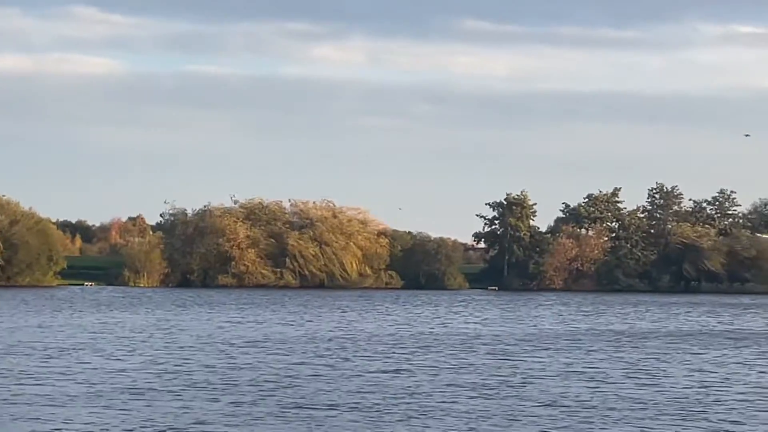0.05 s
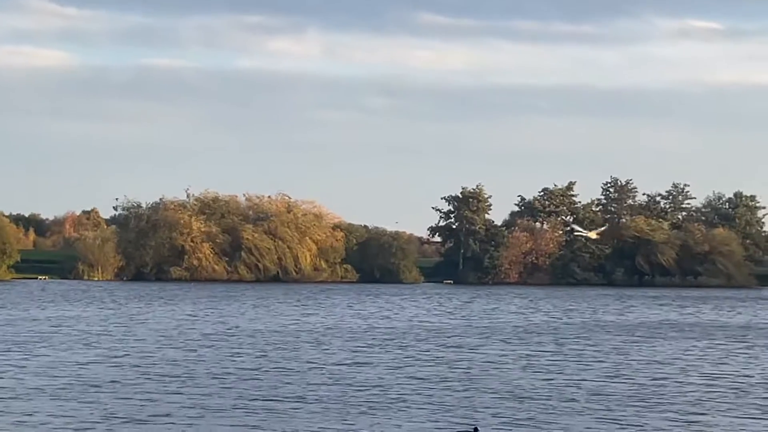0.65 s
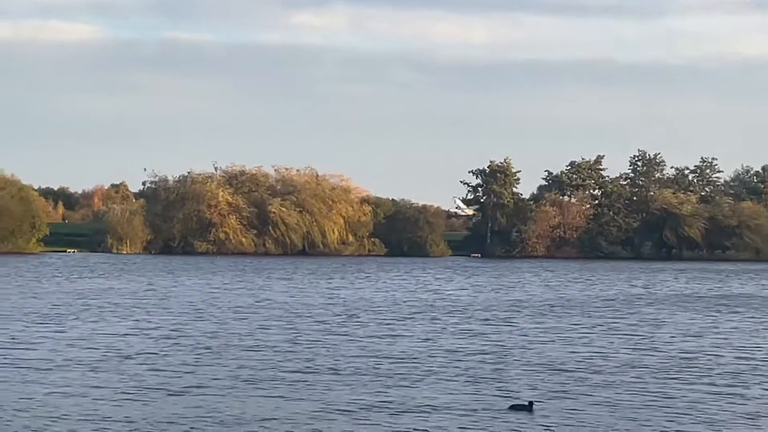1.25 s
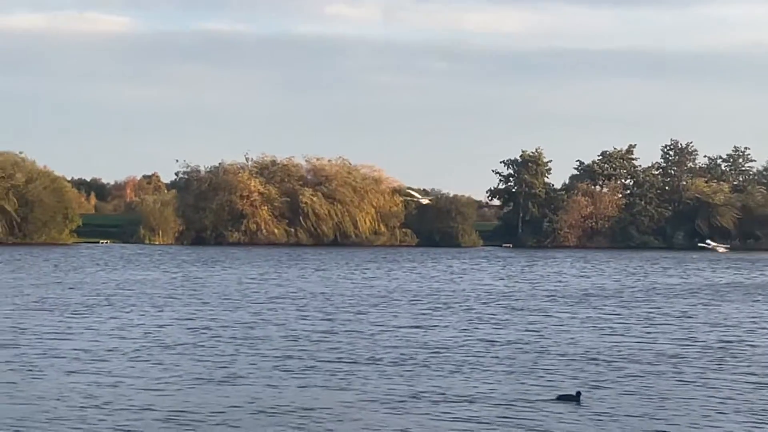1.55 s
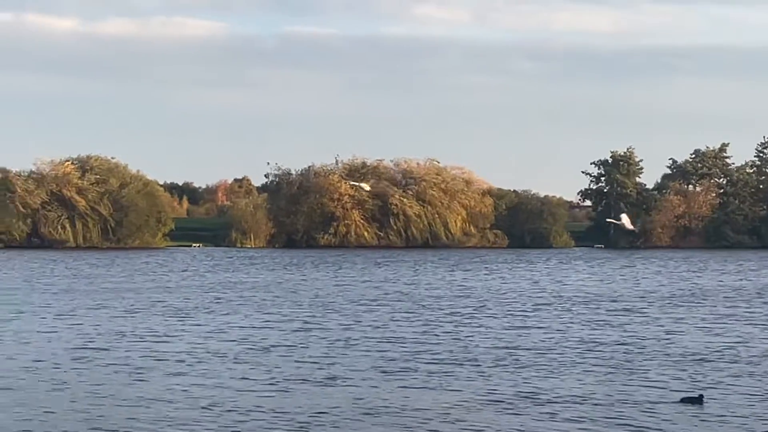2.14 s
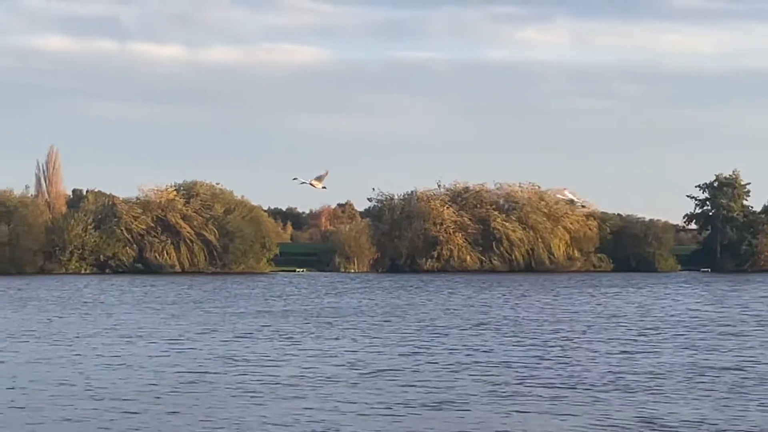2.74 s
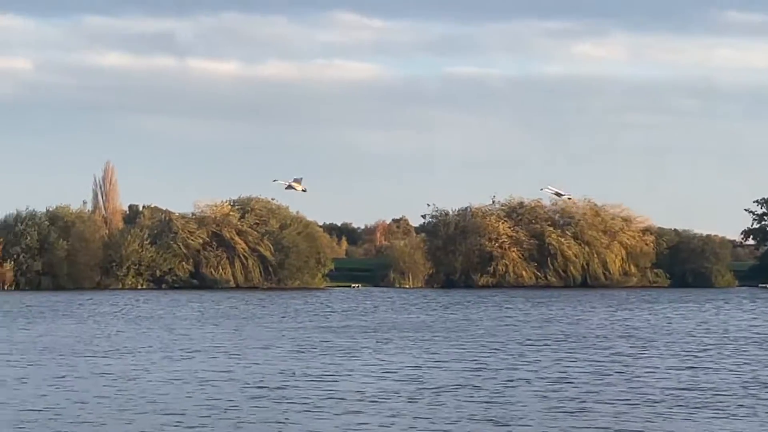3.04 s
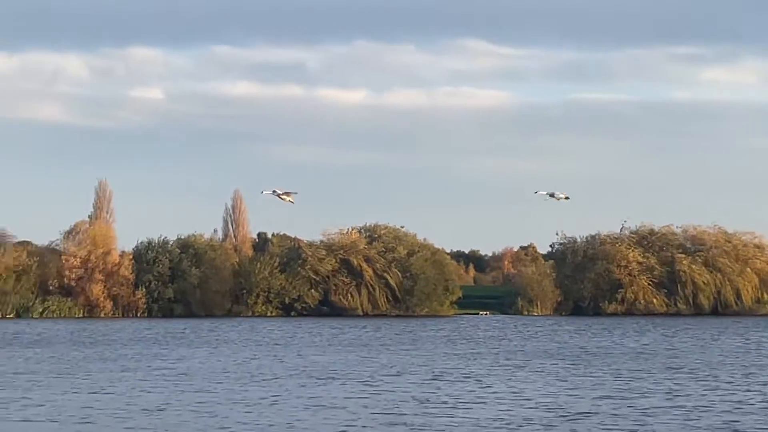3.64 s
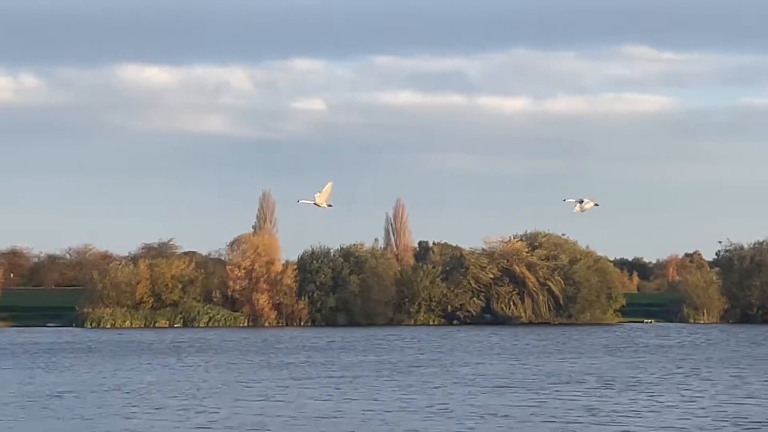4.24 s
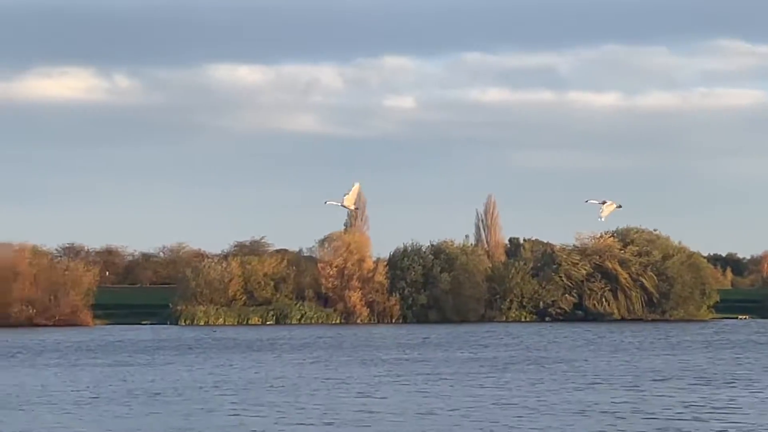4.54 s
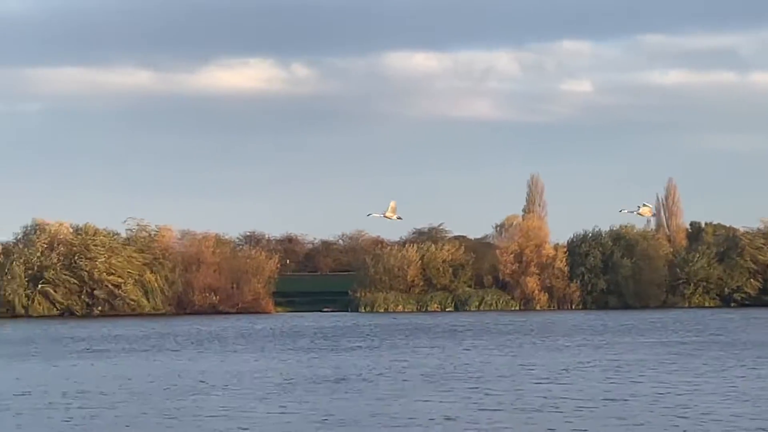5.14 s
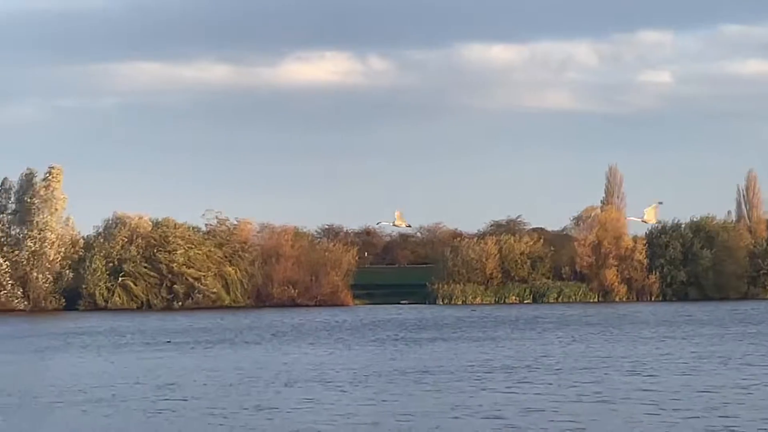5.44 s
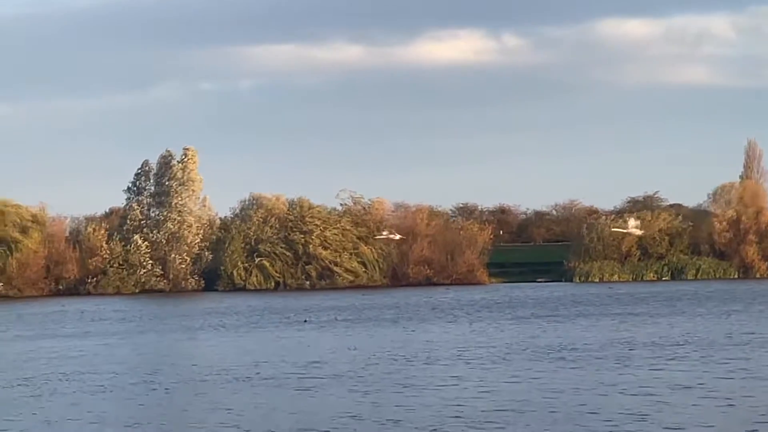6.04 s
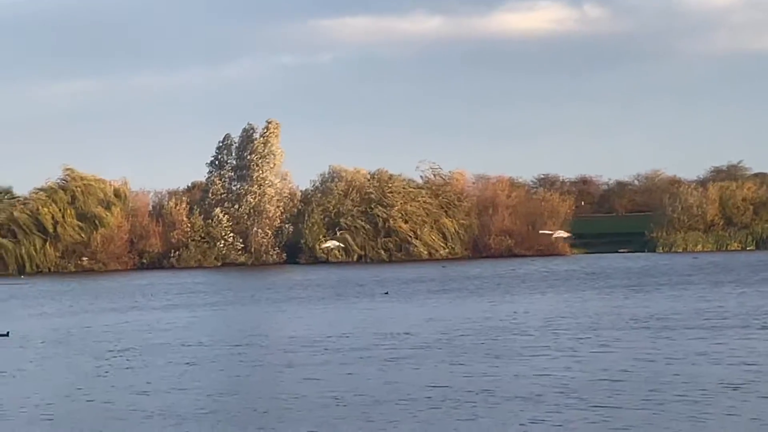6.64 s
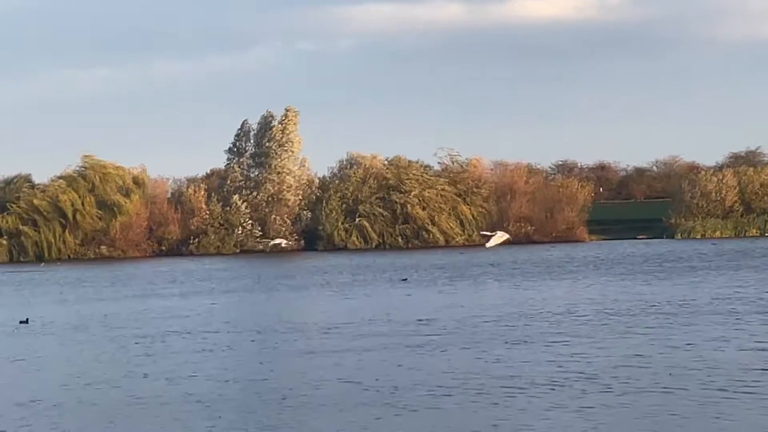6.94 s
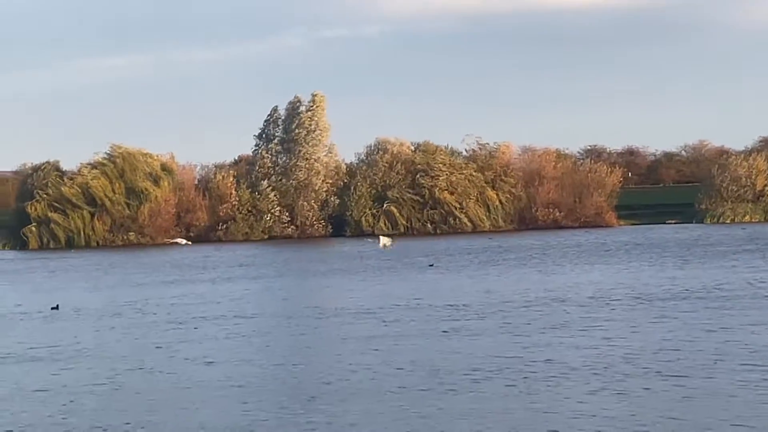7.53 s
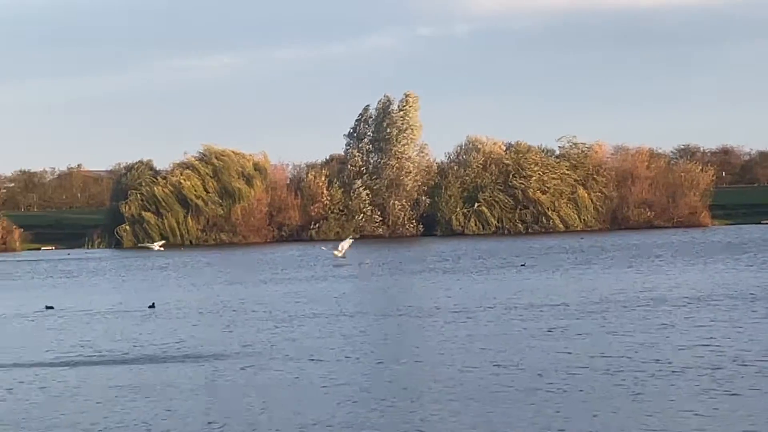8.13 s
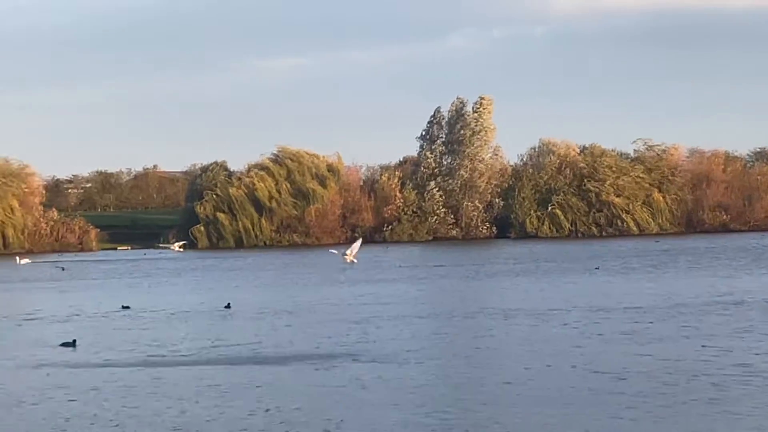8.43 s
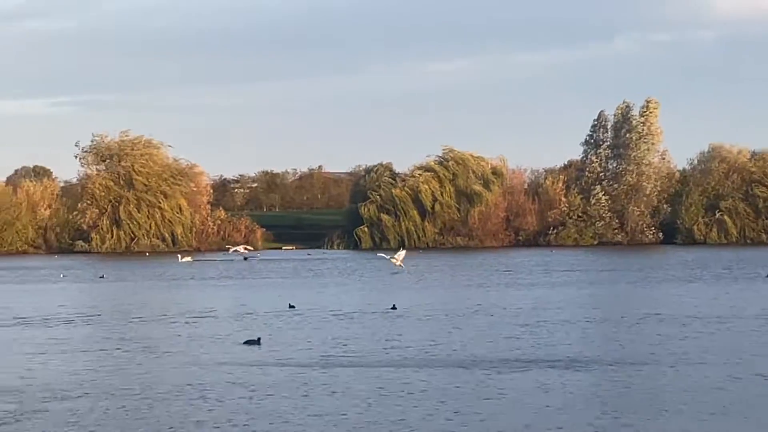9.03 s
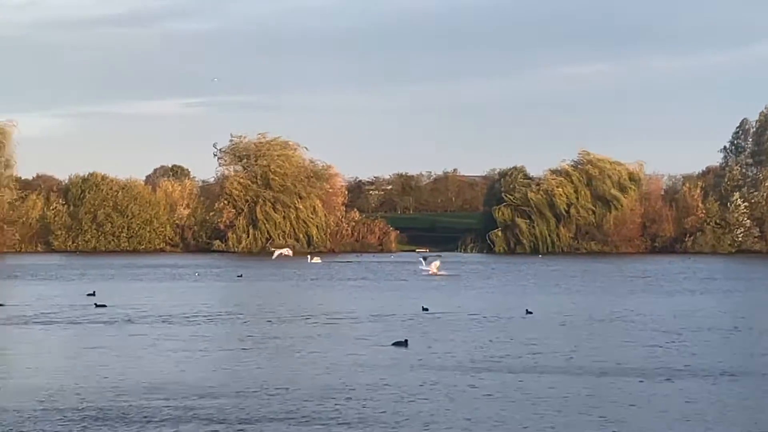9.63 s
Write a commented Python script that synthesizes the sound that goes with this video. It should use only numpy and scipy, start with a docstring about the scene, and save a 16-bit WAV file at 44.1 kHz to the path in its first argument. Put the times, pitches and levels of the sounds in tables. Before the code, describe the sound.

Outdoors on a lake shore, a soft wash of water and trees runs throughout, with tiny ripples ticking close by. For the first second or so, gusts rumble, thump and crackle on the microphone, and a small bird rattles once near 0.9 seconds. Two swans fly past, their hoarse, fluttering wingbeats coming about twice a second, faint at first and louder from around 5.5 seconds to the end. Thin, distant songbird whistles and twittering start at about 1.5 seconds. A waterbird gives short, trilling wails that rise and fall away at about 2.3, 3.8, 4.4 and 7.1 seconds. The wind swells briefly around 6 seconds, then buffets hard from 8.2 seconds. Sharp, dry clucks come at 8.4 and between 9 and 9.4 seconds. A coot toots faintly near 2.9 seconds, then clearly at 8.7 and 9.6, with the wind still rumbling until just before 10 seconds.

```python
"""Swans low over a lake

From the shore, on a phone that the wind buffets: two swans fly past, their hoarse, fluttering
rasps coming about twice a second. Waterbirds wail, toot and cluck, a small bird rattles once,
and thin whistles carry from far off. Close by, ripples tick at the bank over the steady wash
of water and trees."""
import sys
import numpy as np
from scipy import signal
from scipy.fft import rfft, irfft, next_fast_len
from scipy.io import wavfile
from scipy.ndimage import uniform_filter1d

SR = 44100
rng = np.random.default_rng(int(sys.argv[2]) if len(sys.argv) > 2 else 0)


def bounce(signal):
    """Save signal as a 16-bit WAV file at the path given by the first command-line argument."""
    frames = np.transpose(np.atleast_2d(signal))
    limited = np.clip(frames, -1, 1)
    pcm = np.round(limited * 32767).astype(np.int16)
    wavfile.write(sys.argv[1], SR, pcm)


N = 435708
TIME = np.arange(N) / SR

# how much a sound differs between the two microphone ports: (frequency [Hz], side minus mid [dB])
PORT_WIDTH = [(25, -25.5), (100, -9.5), (300, -5.5), (600, -1), (1000, 1.5), (1500, -3.5), (1900, 0),
              (2400, -15.5), (3200, -22), (3800, -69.5), (6500, -8), (7300, 13.5), (9000, 1), (11000, -12),
              (14000, 8.5)]
# gusts on the microphone: (peak time [s], half length [s], rumble [dB], upper rush [dB])
GUSTS = [(0.02, 0.033, -40, -72), (0.231, 0.039, -36, -46.5), (0.369, 0.01, -36.5, -51),
         (0.47, 0.032, -42, -61), (0.675, 0.016, -38, -59), (0.6, 0.028, -37.5, -47.5),
         (0.755, 0.056, -39.5, -48), (0.85, 0.037, -31.5, -48), (0.957, 0.023, -39, -42.5),
         (1.26, 0.041, -45, -54.5), (1.636, 0.025, -50, -69), (1.966, 0.015, -49.5, -69),
         (2.316, 0.048, -46.5, -64), (3.212, 0.016, -44, -73), (4.312, 0.018, -49, -49),
         (6.02, 0.013, -37.5, -53), (6.132, 0.014, -36.5, -51.5), (6.267, 0.035, -41, -57),
         (6.779, 0.017, -37.5, -48), (8.235, 0.031, -27.5, -50), (8.49, 0.11, -29.5, -49),
         (8.592, 0.016, -22.5, -45.5), (8.792, 0.017, -37.5, -53), (9.045, 0.053, -38.5, -44.5),
         (9.274, 0.024, -39.5, -43), (9.47, 0.044, -40, -50), (9.57, 0.021, -38.5, -45)]


def undb(db):
    """Decibels to gain."""
    return 10 ** (np.asarray(db) / 20)


def unit(x):
    """Scale to rms 1."""
    return x / np.sqrt(np.mean(x ** 2) + 1e-20)


def curves(rows):
    """Each column after a table's times, at every sample."""
    times, *columns = np.transpose(rows)
    return [np.interp(TIME, times, column) for column in columns]


def colour(x, points, turn=1):
    """Filter by (frequency [Hz], gain [dB]) points; turn is a phase factor."""
    size = next_fast_len(len(x))
    hz, db = np.transpose(points)
    bins_hz = np.maximum(np.fft.rfftfreq(size, 1 / SR), 1)
    gain = undb(np.interp(np.log(bins_hz), np.log(hz), db))
    return irfft(rfft(x, size) * gain * turn, size)[:len(x)]


def noise(points):
    """Coloured noise of rms 1."""
    return unit(colour(rng.standard_normal(N), points))


def walk(rate_hz, size=N):
    """A smooth random wander with a spread of 1."""
    hold = max(int(SR / rate_hz), 1)
    steps = np.repeat(rng.standard_normal(size // hold + 2), hold)
    return unit(uniform_filter1d(uniform_filter1d(steps, hold), hold))[:size]


def phase_of(hz):
    """Phase in radians of a moving frequency."""
    return 2 * np.pi * np.cumsum(hz) / SR


def add(out, start_s, x):
    """Mix x in from start_s."""
    i = max(int(start_s * SR), 0)
    out[i:i + len(x)] += x[:max(N - i, 0)]


def ping(hz, ring_s):
    """A short resonance whose envelope swells to 1 at ring_s."""
    t = np.arange(SR // 20) / SR
    return t / ring_s * np.exp(1 - t / ring_s) * np.sin(2 * np.pi * hz * t)


def shore_echo(x, t60_s=0.2, delay_s=0.014):
    """The tree line scatters back a short, diffuse tail."""
    t = np.arange(SR) / SR
    scatter = colour(rng.standard_normal(SR), [(1000, -5.0), (4000, -7.0), (9000, 0.0)])
    tail = scatter * undb(-60 * t / t60_s) * (t > delay_s)
    return signal.fftconvolve(x, tail / np.sqrt(np.sum(tail ** 2)))[:N]


def ports(mid, other, shared):
    """Mid and side: the ports' difference is partly the same sound, a quarter cycle apart."""
    side = shared * colour(mid, PORT_WIDTH, 1j) + np.sqrt(1 - shared ** 2) * colour(other, PORT_WIDTH)
    return np.array([mid, side])


def lake(body_db, spray_db, body_gain_db=3.0, hiss_db=-66.5, spray_gain_db=1):
    """All around, the low wash of trees and water, a steadier hiss above it and fine spray on top."""
    # spectra of the wash and of the spray: (frequency [Hz], level [dB])
    wash_spectrum = [(88, -31), (150, -7), (178, -8.5), (331, -1.5), (369, -2), (642, -3.5), (695, -2),
                     (1060, -8.5), (1460, -15), (1680, -15), (2350, -19), (3320, -22.5), (4550, -29.5),
                     (4850, -30.5), (6550, -37), (8520, -94.5), (14400, -120)]
    spray_spectrum = [(5000, -49), (6500, -6.5), (7600, -3), (9800, 1), (12000, -5.5), (14000, -27),
                      (15500, -9.5)]

    def wash():
        water = noise(wash_spectrum)
        body = signal.sosfiltfilt(signal.butter(2, 1500, fs=SR, output="sos"), water)
        spray = noise(spray_spectrum) * undb(2.4 * walk(90))
        layers = [(body, body_db + body_gain_db),
                  (water - body, hiss_db + 0.075 * (body_db - np.mean(body_db))),
                  (spray, spray_db + spray_gain_db)]
        return sum(unit(band) * undb(db + .4 * walk(14)) for band, db in layers)
    return ports(wash(), wash(), shared=.65)


def eddies(points, even_s=0.093):
    """Turbulent noise whose strength stays even from one moment to the next."""
    x = noise(points)
    return x / np.sqrt(uniform_filter1d(x ** 2, int(even_s * SR)) + 1e-6)


def gust(peak_s, half_s, edge=2.6):
    """The envelope of one gust; a higher edge sets in and lets go more squarely."""
    return np.exp(-np.abs((TIME - peak_s) / half_s) ** edge / 2)


def wind(rumble_gain_db=-.5, rush_gain_db=-2, flutter_db=2, breeze_rush_db=-58, rush_growth=0.49):
    """Eddies press on the microphone; strong gusts add a higher rush, and single buffets thump."""
    # the steady breeze: (time [s], rumble [dB])
    breeze = [(0, -55.5), (.85, -47.5), (1.4, -62.5), (1.75, -56.5), (2.75, -61), (3.05, -53), (3.6, -58.5),
              (4.6, -47.5), (5.7, -50.5), (6.4, -49), (7.05, -50), (7.55, -45), (8.9, -47.5), (9.88, -45.5)]
    # spectra of the deep rumble and the rush above it: (frequency [Hz], level [dB])
    rumble_spectrum = [(12, -42.5), (20, -10), (42, 3), (65, 6), (134, -3.5), (177, -11), (206, -13.5),
                       (278, -25.5), (400, -50), (520, -56), (880, -120)]
    rush_spectrum = [(90, -13.5), (150, 0.5), (260, -1.5), (400, -11), (700, -17), (1500, -31.5),
                     (3000, -51.5), (8000, -100)]
    # thumps of air, dropping in pitch:
    # (time [s], peak [dB], pitch [Hz], half length [cycles], fall [per cycle])
    buffets = [(.203, -34.5, 230, 1.4, 0.29), (.233, -38, 199, 1.1, 0.27), (.304, -41.5, 290, 1.2, .3),
               (.589, -30, 157, 1.6, 0.45), (0.733, -30.5, 353, 1.1, 0.42), (.749, -24.5, 150, 0.5, .2),
               (.782, -29.5, 150, 1.2, 0.41), (.833, -26.5, 345, 1.34, 0.37), (.863, -28, 258, 1.4, 0.66),
               (0.907, -32, 230, 2, .4), (.971, -30.5, 172, 0.91, 0.19), (1.227, -40, 284, 1, 0.28),
               (6.021, -28, 84, 1.45, 0.044), (8.414, -26, 95, 1.16, .05), (9.418, -29.5, 75, 0.92, 0.055),
               (8.602, -19, 66.6, 1.08, 0.052), (8.786, -30.5, 194, 1.25, 0.29),
               (9.5794, -16, 250, 0.54, .05)]
    breeze_db, = curves(breeze)
    rumble = undb(breeze_db + flutter_db * walk(16))
    rush = undb(breeze_rush_db + rush_growth * (breeze_db - np.mean(breeze_db)))
    for peak_s, half_s, rumble_db, rush_db in GUSTS:
        swell = gust(peak_s, half_s)
        rumble = np.hypot(rumble, undb(rumble_db) * swell)
        rush = np.hypot(rush, undb(rush_db) * swell)
    mid, other = (undb(rumble_gain_db) * rumble * eddies(rumble_spectrum)
                  + undb(rush_gain_db) * rush * eddies(rush_spectrum) for _ in range(2))
    t = np.arange(-SR // 20, SR // 20) / SR
    for peak_s, db, hz, half_cycles, fall in buffets:
        cycles = np.log(np.maximum(1 + fall * hz * t, 1e-9)) / fall
        thump = np.cos(2 * np.pi * cycles) * np.exp(-(cycles / half_cycles) ** 2)
        add(mid, peak_s + t[0], undb(db) * thump)
    return ports(mid, other, shared=0.61)


def rustle(gain_db=-17, grain_db=5.0):
    """The strongest gusts rustle right at the microphone in uneven crackles."""
    # spectrum of the crackle: (frequency [Hz], level [dB])
    spectrum = [(400, -7), (800, 4.5), (1500, -8.5), (3000, -8), (5500, -30.5), (8000, -50.5)]
    force = sum(undb(rush_db) * gust(peak_s, half_s) for peak_s, half_s, _, rush_db in GUSTS)
    grain = unit(undb(grain_db * walk(220)))
    mid, other = (undb(gain_db) * force * grain * noise(spectrum) for _ in range(2))
    return ports(mid, other, shared=.7)


def ripples(spray_db, over_spray_db=7, plop_db=5, bubbles=240):
    """Drips tick at the bank close by; tiny bubbles burst, louder where the spray is stronger."""
    # the louder drips: (time [s], peak [dB], pitch [Hz], twice the ring time [s])
    drips = [(.269, -41.5, 3640, 0.0002), (0.3205, -45, 8000, 0.000074), (.547, -46, 6000, 0.000083),
             (1.062, -41.5, 2070, 0.0014), (1.072, -32, 5100, 0.0001), (1.19, -51, 7000, .00015),
             (1.817, -48, 5000, 0.0002), (1.647, -53, 10500, .00062), (2.0532, -44, 9400, 0.00013),
             (2.127, -43, 2700, 0.00064), (2.128, -47, 4960, .0004), (2.44, -47, 4100, .00025),
             (2.7197, -49.5, 9600, 0.00025), (2.748, -44.5, 5100, 0.00017), (3.008, -52, 4900, 0.00035),
             (3.659, -53, 9500, 0.00022), (3.742, -46, 3070, 0.00078), (4.257, -43.5, 4500, 0.00028),
             (4.3218, -36, 5400, 0.00023), (4.583, -28.5, 2700, 0.0009), (5.37, -51, 2610, .0016),
             (5.454, -55, 11300, .00037), (5.7544, -48, 10500, 0.00018), (7.551, -48, 5250, .00035),
             (7.818, -44.5, 760, 0.0047), (8.575, -50, 4040, 0.00065), (9.033, -48.5, 5200, .00044),
             (9.425, -44.5, 4170, .00072)]
    out = np.zeros(N)
    for start_s, db, hz, double_ring_s in drips:
        add(out, start_s, undb(db) * ping(hz, double_ring_s / 2))
    for when, strength, pitch, plop in rng.random((bubbles, 4)):
        chance_db = 6.5 * min(-np.log(1 - strength), 3.3)
        burst = ping(9000 + 3500 * pitch, .00022) + undb(plop_db) * plop * ping(1800 + 4000 * pitch, .0002)
        add(out, when * N / SR, undb(spray_db[int(when * N)] + over_spray_db + chance_db) * burst)
    # each burst trails off in a brief fizz
    return out + 0.38 * shore_echo(out, 0.1, 0.00066)


def swan_rasps(gain_db=4.0, scatter_db=1.5, duty=0.35, arch=.15, fade_shape=1.62, hoarse=0.57,
               jitter_s=.0006, slowing=.007, third_db=-5, hiss_lag_s=.002, hiss_s=0.0023, hiss_gain_db=3):
    """Trains of rough upward chirps, each closed by a spit of hiss; the flutter slows as it weakens."""
    # the passing rasps: (peak time [s], swell [s], fade [s], level [dB], relative hiss [dB],
    # flutter [Hz], pitch [Hz], rise of each chirp [octaves])
    rasps = [(.58, 0.042, 0.048, -60.5, -20, 98, 2106, 0.69),
             (1.599, 0.042, 0.036, -63, -23, 103, 2110, 0.65),
             (2.191, 0.023, 0.029, -58, -17, 93, 2135, 0.65),
             (2.861, 0.035, 0.031, -59, -15, 94, 2030, 0.62),
             (3.42, 0.031, 0.035, -63, -20, 96, 1985, 0.575),
             (4.049, 0.015, 0.011, -50, -18, 116, 2220, .9),
             (4.552, 0.031, 0.088, -57, -11, 89, 2170, 0.68),
             (5.068, 0.024, 0.028, -55, -17, 82, 1763, 0.95), (5.71, 0.033, 0.045, -49, -11.5, 89, 1822, 1),
             (6.174, 0.028, 0.047, -49, -9.5, 100, 1962, 0.74),
             (6.669, 0.04, 0.062, -55.5, -12, 94, 1920, 0.91),
             (7.17, 0.027, 0.062, -54.5, -12, 82, 2420, 0.62), (7.62, 0.038, .046, -49, -14.5, 94, 1836, 1),
             (8.163, 0.038, 0.049, -52, -15, 86, 1648, 0.9),
             (8.637, 0.024, 0.0406, -50, -2.5, 91, 1787, 0.68),
             (9.091, 0.03, 0.045, -44.5, -13, 95, 1825, 0.567),
             (9.493, .027, 0.016, -41, -6.5, 101, 1765, 0.42),
             (9.767, 0.032, 0.02, -42.5, -12, 100, 1920, .5)]
    # distant rasps are airy, close ones ring: (level [dB], noise over tone [ratio])
    grit_by_level = [(-52, 1.0), (-45.5, 0.34)]
    # spectra of the breath in the throat and of the hiss: (frequency [Hz], level [dB])
    throat_spectrum = [(800, -23.5), (1300, 0.5), (1650, 5), (2000, -9.5), (2500, 2), (3000, -4),
                       (4500, -28)]
    hiss_spectrum = [(2200, -5), (3100, -5.5), (3800, 2.5), (4500, -1), (5300, -3), (5650, 0), (6200, 3),
                     (6550, -4), (6950, -12), (12000, -18)]
    tone, breath, spit = np.zeros((3, N))
    t = np.arange(-SR // 100, SR // 100) / SR
    spit_shape = np.exp(-((t - hiss_lag_s) / hiss_s) ** 2)
    for peak_s, swell_s, fade_s, db, hiss_db, flutter_hz, pitch_hz, rise in rasps:
        grit = np.interp(db, *np.transpose(grit_by_level))
        sweep_hz = pitch_hz * 2 ** (rise / 2 * np.tanh(2.4 * t * flutter_hz))
        for k, (late, loud, sharp, turn) in zip(range(-12, 17), rng.standard_normal((29, 4))):
            lag = k / flutter_hz * (1 + slowing * abs(k)) + jitter_s * late
            effort = np.exp(-((-lag / swell_s) ** 2 if lag < 0 else (lag / fade_s) ** fade_shape) / 2)
            size = effort * undb(gain_db + db + scatter_db * loud)
            # the chirps are highest where the effort is greatest
            hz = sweep_hz * np.exp(0.0348 * sharp + arch * (effort - 1))
            phase = phase_of(hz) + np.pi * turn + hoarse * walk(900, len(t))
            chirp = np.sqrt(2) * (np.sin(phase) + undb(hiss_db + third_db) * np.sin(3 * phase))
            puff = size / np.hypot(1, grit) * np.exp(-np.abs(t * flutter_hz / duty) ** 2.6)
            start_s = peak_s + lag + t[0]
            add(tone, start_s, puff * chirp)
            add(breath, start_s, grit * puff)
            add(spit, start_s, size * undb(hiss_db + hiss_gain_db) * spit_shape)
    out = tone + breath * noise(throat_spectrum) + spit * noise(hiss_spectrum)
    # a short scatter off the water fills the gaps between pulses
    return out + 0.47 * shore_echo(out, 0.11, 0.00027)


def churr(peak_s=.8755, rate_hz=66, throat_db=-48.5, throat_s=0.06, chest_db=-55, chest_s=0.11):
    """A small bird rattles in the trees: air bursts through a narrow throat over a longer, lower rasp."""
    # spectra of the throat and the chest: (frequency [Hz], level [dB])
    throat_spectrum = [(2000, -26), (2700, -22), (3500, -2.5), (4300, 7), (4900, -6), (5900, -18),
                       (8000, -40)]
    chest_spectrum = [(800, -23), (1500, 6), (2100, -15), (4000, -21)]
    t = TIME - peak_s
    pulse = ((1 + np.cos(2 * np.pi * rate_hz * t + 0.23 * walk(59.7))) / 2) ** 2
    throat = undb(throat_db) * noise(throat_spectrum) * np.exp(-(t / throat_s) ** 2 / 2)
    chest = undb(chest_db) * noise(chest_spectrum) * np.exp(-(t / chest_s) ** 4 / 2)
    out = (throat + chest) * pulse * undb(walk(70.1))
    return out + 0.47 * shore_echo(out, .08, 0.0024)


def whistles(gain_db=-2.0, waver=0.0161, flicker_db=4, bend=.08, wet=0.88, answer_db=-7, detune=.11,
             stagger_s=.02, flock_db=-71, flock_start_s=1.45, flock_notes=600):
    """Thin whistles from across the water; fainter neighbours chime in, and a flock twitters behind."""
    # the nearer songbirds' arched or slurred notes:
    # (time [s], length [s], start pitch [Hz], middle pitch [Hz], end pitch [Hz], level [dB])
    songbirds = [(1.742, 0.033, 2850, 3480, 2920, -54), (1.93, 0.15, 3500, 3850, 3570, -60.5),
                 (2.229, 0.078, 3000, 3150, 3190, -56.5), (2.58, .05, 3750, 3700, 3550, -59),
                 (2.791, 0.096, 4700, 4160, 3210, -55), (2.842, .07, 2800, 2600, 2530, -60),
                 (2.845, 0.12, 3900, 3790, 3440, -56), (3.01, 0.053, 4450, 4490, 4360, -56.5),
                 (3.058, 0.088, 3300, 3370, 3600, -57), (3.21, .04, 4450, 4420, 4450, -57),
                 (3.232, 0.097, 4050, 3590, 3280, -57), (3.412, 0.086, 2850, 3350, 3150, -61),
                 (4.68, 0.045, 3500, 3250, 2850, -62), (4.752, .075, 3500, 4180, 3350, -59.5),
                 (4.785, 0.11, 2850, 3050, 2890, -59), (4.815, .06, 3350, 3200, 3000, -65),
                 (4.904, .032, 3500, 3300, 3250, -53.5), (4.973, .06, 4200, 3800, 3020, -60),
                 (4.972, 0.073, 2950, 3210, 2950, -56), (5.775, 0.048, 4550, 4460, 4400, -60.5),
                 (5.8, 0.081, 3550, 3890, 3520, -57.5), (6.192, .055, 3900, 3560, 2920, -50.5),
                 (6.229, 0.18, 3200, 3060, 2890, -58.5), (6.449, 0.052, 3100, 3350, 3200, -54.5),
                 (6.478, 0.12, 3000, 3080, 2920, -57.5), (6.889, .08, 4000, 3830, 3100, -57),
                 (6.952, 0.068, 3300, 3050, 3280, -55), (7.177, .05, 3400, 3560, 3330, -60),
                 (7.395, .04, 4600, 4270, 4000, -60), (7.712, 0.06, 5000, 5080, 5100, -64.5),
                 (7.765, 0.048, 3900, 4280, 4000, -62), (7.893, 0.066, 3000, 3330, 3030, -60),
                 (8.145, 0.16, 2850, 3236, 2950, -54.5), (8.17, .1, 4500, 4200, 3720, -59),
                 (8.225, 0.057, 3300, 3580, 3480, -57), (8.304, 0.077, 2650, 3010, 2720, -56.5),
                 (8.5, .08, 3050, 3160, 3200, -63), (8.926, 0.034, 2700, 3310, 3900, -66),
                 (8.95, 0.022, 4300, 3600, 3000, -62), (9.286, .14, 2950, 3275, 2820, -60.5),
                 (9.354, .06, 4500, 4170, 3700, -62), (9.508, 0.055, 2950, 3100, 2700, -55),
                 (9.553, 0.037, 4400, 4350, 4200, -62), (9.675, 0.058, 2700, 2900, 3340, -58),
                 (9.834, 0.053, 2700, 3030, 3200, -57)]
    notes = [(s, length_s, np.array(shape), db + gain_db) for s, length_s, *shape, db in songbirds]
    answers, flock = [], []
    for start_s, length_s, shape, db in notes:
        for late, sharp, *turn in rng.standard_normal((2, 5)):
            shift = np.exp(detune * sharp + bend / 2 * np.array(turn))
            answers.append((start_s + stagger_s * late, length_s, shape * shift, db + answer_db))
    chances = rng.random((flock_notes, 4))
    for (when, length, pitch, loud), turn in zip(chances, rng.standard_normal((flock_notes, 3))):
        start_s = flock_start_s + when * (N / SR - flock_start_s)
        shape = (2950 + 1900 * pitch ** 1.4) * np.exp(bend * turn)
        flock.append((start_s, .02 + 0.045 * length, shape, flock_db + 6 * (loud - pitch)))
    out = np.zeros(N)
    for start_s, length_s, (start_hz, middle_hz, end_hz), db in notes + answers + flock:
        u = np.linspace(-1, 1, int(length_s * SR))
        arc_hz = middle_hz + (end_hz - start_hz) / 2 * u + ((start_hz + end_hz) / 2 - middle_hz) * u ** 2
        hz = arc_hz * (1 + waver * walk(120, len(u)) + .015 * walk(700, len(u)))
        envelope = signal.windows.tukey(len(u), .35) * undb(db + flicker_db * walk(115, len(u)))
        add(out, start_s, np.sin(phase_of(hz)) * envelope)
    return (out + wet * shore_echo(out, 0.22, 0.0011)) / np.hypot(1, wet)


def wails(rough=0.0089, trill_rough=0.0296, hoarse=0.13, throat_hz=5250, throat_db=9, third_db=-8,
          shimmer_db=1.9, merge_s=0.074, linger_s=0.034):
    """A waterbird's trill runs together into a held, clear tone, climbs to a thin crest and falls away."""
    # each call's trill: (time it smooths out [s], pulse rate [Hz],
    # pitch swing in a pulse [share, minus = falling], second harmonic [dB])
    trills = [(2.365, 72.6, -0.058, -20), (3.93, 65.2, 0.056, -8), (4.462, 60.4, -0.08, -21.5),
              (7.295, 62.6, 0.1, -14)]
    # each call's course, the first cracking briefly upward: (time [s], pitch [Hz], level [dB])
    courses = [
        [(2.225, 1472, -67), (2.33, 1580, -55), (2.38, 1400, -47), (2.4, 1463, -48.5), (2.485, 1457, -48),
         (2.505, 1605, -45.5), (2.51, 2085, -66), (2.528, 2050, -54), (2.533, 1647, -48), (2.578, 1546, -51),
         (2.598, 1130, -64)],
        [(3.766, 1259, -60), (3.8, 1338, -57.5), (3.89, 1390, -54), (3.95, 1450, -49), (3.987, 1400, -49),
         (4.015, 1733, -57), (4.035, 1787, -61), (4.07, 1620, -57.5), (4.115, 1314, -54), (4.144, 820, -55)],
        [(4.382, 1562, -60), (4.415, 1620, -46.5), (4.45, 1539, -48), (4.478, 1400, -45), (4.53, 1560, -46.5),
         (4.58, 1598, -46), (4.635, 1510, -46), (4.685, 1780, -52.5), (4.735, 1560, -52), (4.764, 1330, -59)],
        [(7.113, 1284, -59), (7.15, 1380, -50.5), (7.2, 1510, -51), (7.235, 1380, -51), (7.29, 1400, -48.5),
         (7.33, 1445, -52), (7.38, 1474, -52), (7.41, 1420, -55), (7.442, 1116, -57)],
    ]
    out = np.zeros(N)
    for (smooth_s, trill_hz, swing, second_db), course in zip(trills, courses):
        times, pitch_hz, course_db = np.transpose(course)
        t = np.arange(times[0], times[-1], 1 / SR)
        hz, db = np.interp(t, times, pitch_hz), np.interp(t, times, course_db)
        depth = np.clip((smooth_s + linger_s - t) / merge_s, .06, 1)
        beat = phase_of(trill_hz * (1 + 0.044 * walk(63, len(t)))) - np.pi
        pulse = 1 - depth + depth * 1.5 * (1 + np.cos(beat)) / 2
        jitter = (rough + trill_rough * depth) * walk(400, len(t))
        phase = phase_of(hz * (1 + jitter + swing * depth * np.sin(beat)))
        # uneven cycles blur the overtones more than the fundamental
        phase += hoarse * (1 + 2.0 * depth) * walk(1100, len(t))
        # a throat resonance lifts the third harmonic at the crest
        lift_db = throat_db * np.exp(-((3 * hz - throat_hz) / 170) ** 2)
        overtones = np.sin(2 * phase) + undb(third_db + lift_db) * np.sin(3 * phase)
        voice = np.sin(phase) + undb(second_db - 4 * depth + 2.7 * walk(89.6, len(t))) * overtones
        envelope = signal.windows.tukey(len(t), .04) * undb(db + shimmer_db * walk(149.7, len(t)))
        add(out, t[0], np.sqrt(2) * voice * pulse * envelope)
    return out


def coot_toots(sag=0.053, fade_db=7):
    """A coot's short horn note starts at once and sags in pitch."""
    # the notes: (time [s], length [s], pitch [Hz], level [dB], tilt [dB per harmonic], roughness [0-1])
    toots = [(2.855, 0.036, 907, -57.5, -18, 0.05), (8.678, 0.046, 786, -44.5, 0.5, 0.03),
             (9.615, 0.05, 805, -41, 2, 0)]
    # the coot's timbre: (harmonic [number], level [dB])
    harmonics = [(1, 3.5), (2, 3), (3, -4.5), (4, -8.5), (5, -14), (6, -28), (7, -34), (8, -41)]
    out = np.zeros(N)
    for start_s, length_s, hz, db, tilt_db, rough in toots:
        u = np.linspace(0, 1, int(length_s * SR))
        phase = phase_of(hz * (1 - sag * u ** 1.5 + rough * walk(500, len(u))))
        voice = sum(undb(part_db + tilt_db * (k - 1)) * np.sin(k * phase) for k, part_db in harmonics)
        add(out, start_s, unit(voice) * undb(db - fade_db * u ** 2) * signal.windows.tukey(len(u), .14))
    return out


def clucks(gap_s=.0068, ring_s=0.00072, upper_hz=4100, upper_db=-15):
    """A few dry pulses ring a bird's throat, growing to a strong knock."""
    # runs of knocks: (time of the loudest [s], swell [s], fade [s], peak [dB], throat pitch [Hz])
    runs = [(8.4324, 0.019, 0.0025, -31, 1380), (9.02, .003, .003, -39, 1490),
            (9.2763, 0.0087, 0.013, -28, 1510), (9.353, .01, 0.0037, -38.5, 1500)]
    out = np.zeros(N)
    for peak_s, swell_s, fade_s, db, throat_hz in runs:
        for lag in gap_s * np.arange(-3, 2):
            effort = np.exp(lag / swell_s if lag < 0 else -lag / fade_s)
            hz = throat_hz * (1 + 0.11 * rng.standard_normal())
            knock = ping(hz, ring_s) + undb(upper_db) * ping(upper_hz, ring_s / 2)
            add(out, peak_s + lag - ring_s, effort * undb(db) * knock)
    return out


def scene(echo_db=-14.5, side_db=-2):
    """Birds and ripples reach the two ports slightly apart; wash and wind surround them."""
    # the wash of water and trees: (time [s], body [dB], fine spray [dB])
    wash_levels = [(0, -62.5, -90.5), (1.15, -63.5, -86), (1.5, -62, -93.5), (2.7, -66, -84),
                   (3.15, -65.5, -91.5), (3.65, -66, -88), (4.4, -62, -84.5), (5.5, -59.5, -90.5),
                   (7, -59.5, -92.5), (9, -59.5, -97.5), (9.88, -55.5, -87.5)]
    # the phone's response to distant birds: (frequency [Hz], gain [dB])
    distant_response = [(100, 10), (6600, -5), (7300, -16), (10000, -21), (15000, -45.5)]
    body_db, spray_db = curves(wash_levels)
    calls = swan_rasps() + wails() + coot_toots() + clucks() + whistles() + churr()
    birds = colour(calls, distant_response)
    direct = birds + ripples(spray_db)
    at_ports = np.array([direct, undb(side_db) * colour(direct, PORT_WIDTH, 1j)])
    echo = undb(echo_db) * np.array([shore_echo(birds), colour(shore_echo(birds), PORT_WIDTH)])
    mid, side = at_ports + echo + lake(body_db, spray_db) + wind() + rustle()
    return np.array([mid + side, mid - side])


def record(dry):
    """The phone sheds the deepest rumble and cuts the top."""
    bottom_hz, top_hz = 40, 15800
    x = signal.sosfilt(signal.butter(4, bottom_hz, "high", fs=SR, output="sos"), dry)
    return signal.sosfilt(signal.ellip(8, .2, 70, top_hz, fs=SR, output="sos"), x)


dry = scene()
out = record(dry)
bounce(out)
```